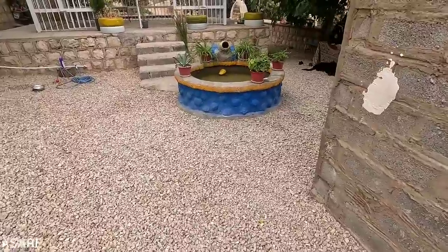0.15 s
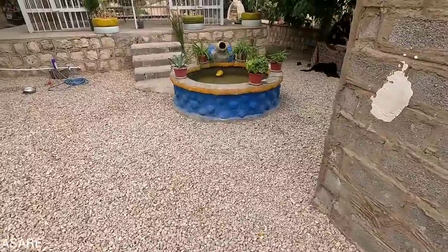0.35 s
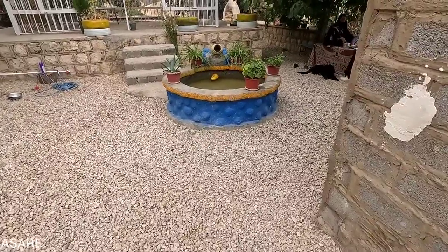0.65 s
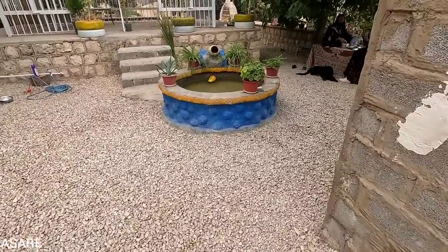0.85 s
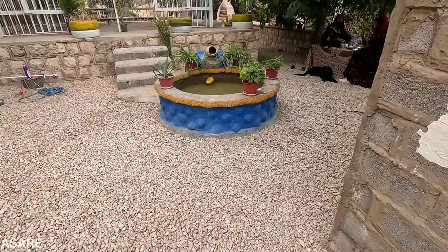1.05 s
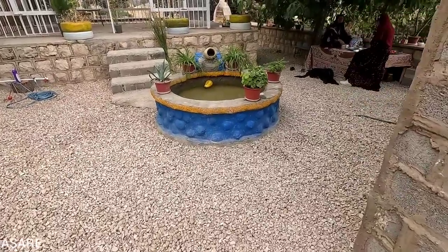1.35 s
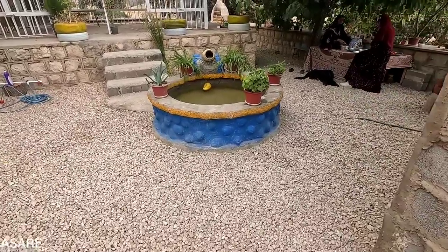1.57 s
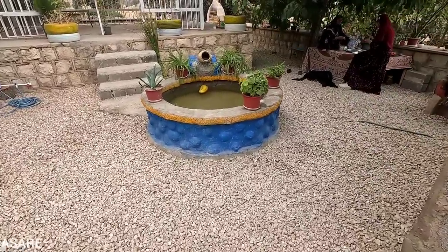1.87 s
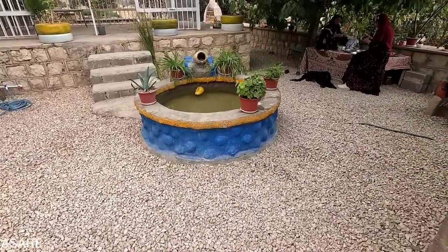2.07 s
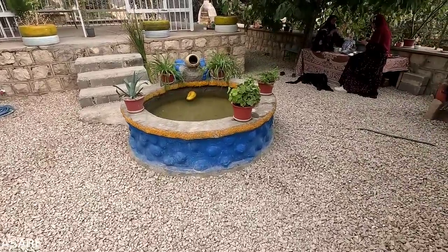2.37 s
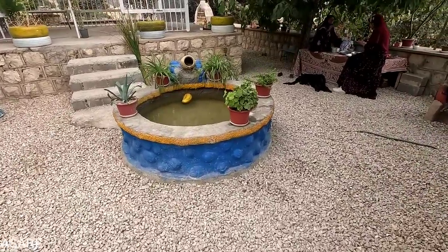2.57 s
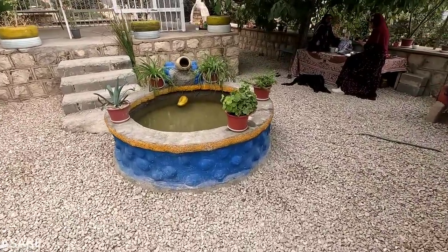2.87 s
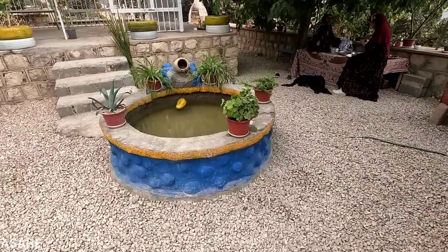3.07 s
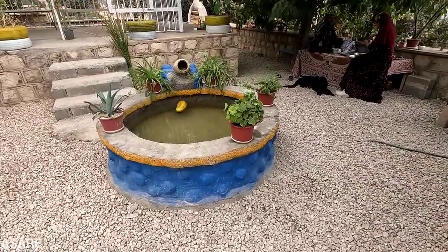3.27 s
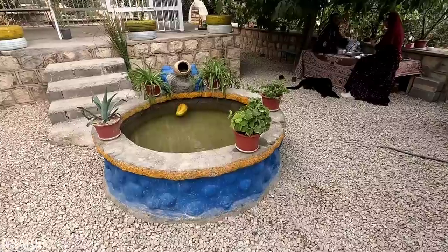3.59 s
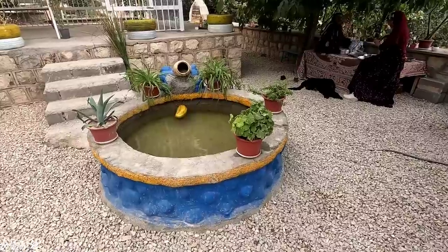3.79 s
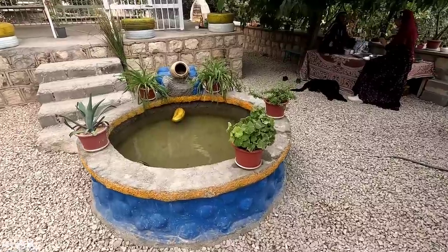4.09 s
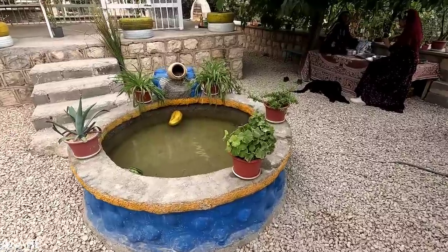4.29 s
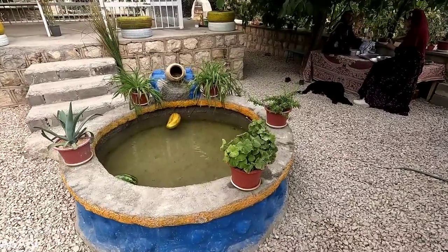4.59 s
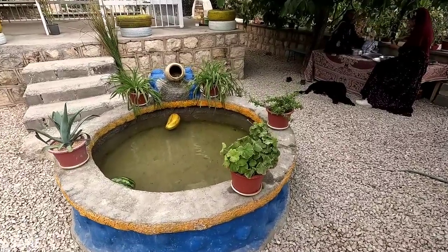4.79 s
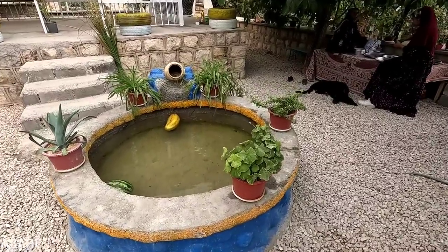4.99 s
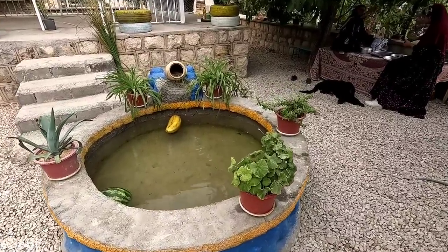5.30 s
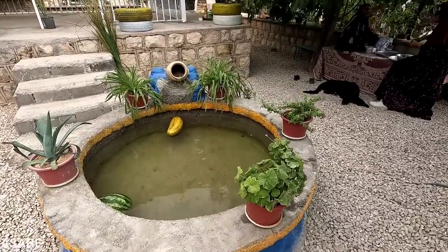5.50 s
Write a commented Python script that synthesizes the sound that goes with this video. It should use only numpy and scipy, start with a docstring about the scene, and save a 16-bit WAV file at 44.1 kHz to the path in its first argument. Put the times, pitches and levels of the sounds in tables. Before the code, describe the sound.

In an open, stone-walled gravel yard, a thin stream falls into a basin. At first the water is a faint, continuous trickle some way ahead, with soft low plops at 0.1-0.3 s. A handheld stereo microphone is carried slowly closer. Gravel grinds underfoot near 0.4, 1.3, 2.1-2.3, 3.2, 4.1 and 5.1 s, with dull pebble knocks; sharp snaps stand out around 2.2, 3.2 and 5.2 s. Low wind thumps press on the microphone, mild at 0.4 and 1.3 s, strongest at 2.2-2.5 and 3.0-3.2 s, weaker around 3.7 and 4.1 s, slightly heavier on the right. From 3.4 s plops crowd together, and after 4.5 s bright drips and ticks ring clearly over bubbling and fizzy spray. A quiet hiss and rumble swells around 4 s. The trickle is loudest and brightest at the end, about 5.6 s, with a wet plop near 5.46 s.

```python
"""Walking up to a garden basin

A thin stream of water falls into a basin in a walled gravel yard: noise clicks make the spray's ticks,
fading sine tones make small bubbles ping and larger ones plop. Someone walks slowly toward it with the
microphone: gravel grinds and pebbles knock, and the trickle grows louder and brighter.
Low noise and single pressure pulses make the wind that thumps on the microphone's two ports.
Steady noise makes a background of hiss and low rumble that swells by about 6 dB, mostly near 4 s."""
import sys
import numpy as np
from scipy import signal
from scipy.fft import rfft, irfft, next_fast_len
from scipy.io import wavfile
from scipy.ndimage import uniform_filter1d, map_coordinates

SR = 44100
rng = np.random.default_rng(int(sys.argv[2]) if len(sys.argv) > 2 else 0)


def to_wav(sig):
    """Store sig (one row per channel, or 1-D mono) as 16-bit WAV at the path in sys.argv[1].

    Samples outside -1..1 are clipped; the rate is SR.
    """
    pcm = np.clip(np.atleast_2d(sig), -1, 1) * 32767
    pcm = np.round(pcm).astype(np.int16)
    wavfile.write(sys.argv[1], SR, pcm.T)  # frames by channels


N = 249165  # length in samples


def amp(db):
    """Turn decibels into a gain."""
    return 10 ** (np.asarray(db) / 20)


def unit(x):
    """Scale to an average (rms) level of 1."""
    return x / np.sqrt(np.mean(x ** 2) + 1e-20)


def along(points, hz):
    """Read a curve of (Hz, value) points on a logarithmic pitch axis."""
    f, v = np.transpose(points)
    return np.interp(np.log(hz + 1), np.log(f + 1), v)


def curves(rows):
    """Draw straight lines between rows: one value per sample for each column after the time."""
    s, *cols = np.transpose(rows)
    return [np.interp(np.arange(N) / SR, s, c) for c in cols]


def wobble(rate):
    """A smooth random curve through this many random points a second."""
    points = rng.standard_normal(int(N * rate / SR) + 4)
    return map_coordinates(points, [np.arange(N) * rate / SR])


def filtered(x, response):
    """Multiply the spectrum of x by a response that depends on frequency."""
    m = next_fast_len(N + SR // 2)
    return irfft(rfft(x, m) * response(np.fft.rfftfreq(m, 1 / SR)), m)[..., :N]


def coloured(x, spectrum):
    """Shape x with a (Hz, dB) spectrum."""
    return filtered(x, lambda hz: amp(along(spectrum, hz)))


def noise(spectrum):
    """Coloured noise with an rms level of 1."""
    return unit(coloured(rng.standard_normal(N), spectrum))


def pair(spectrum, side_db):
    """Stereo noise: a part shared by both ports, and a part of opposite sign at side_db below or above it."""
    mid = noise(spectrum)
    side = amp(side_db) * noise(spectrum)
    return unit(np.array([mid + side, mid - side]))


def steadied(x, length):
    """Even out swells slower than about length seconds, leaving the fast churn."""
    power = uniform_filter1d(np.mean(np.atleast_2d(x) ** 2, axis=0), int(length * SR))
    return x / np.sqrt(np.abs(power) + 0.0072)


def add(track, s, sound):
    """Mix a sound into the track at time s."""
    start = int(np.clip(round(s * SR), 0, N - 1))
    track[start:start + len(sound)] += sound[:N - start]


def bubble(t, hz, cycles, rise):
    """A trapped air bubble swells, then dies away; its pitch rises by the given share near the surface."""
    age = t * hz / cycles
    glide = 1 + rise * age / (2 + age / 2)
    envelope = 2 * np.exp(-age) * (1 - np.exp(-2 * age))
    return np.sin(2 * np.pi * hz * t * glide) * envelope


def swarm(times, hz, gain, cycles, rise, size):
    """Many bubbles, each with its own life and glide, summed into one track."""
    t = np.arange(size) / SR
    life = cycles * np.exp(rng.standard_normal((len(times), 1)) / 2)
    rises = rise * rng.uniform(0.091, 0.74, life.shape)
    rings = gain[:, None] * bubble(t, hz[:, None], life, rises)
    rings = rings * (1 - (t / t[-1]) ** 2)  # end in silence
    index = (times * SR).astype(int)[:, None] + np.arange(size)
    return np.bincount(index.ravel(), rings.ravel(), N)[:N]


# Level of the background hiss and rumble. Each row: time in seconds, level in dB.
BACKGROUND_LEVEL = [(0, -61.5), (2, -62), (4, -60), (4.6, -56.5), (5.65, -56)]
# Tone of that background. Each row: frequency in Hz, relative level in dB.
BACKGROUND_TONE = [(60, 4.5), (200, -3), (400, -15), (700, -19), (1100, -17.5), (1800, -22), (5000, -17),
                   (9000, -45), (15000, -48)]


def background():
    """Steady background hiss and low rumble, coloured noise swelling by about 6 dB, mostly near 4 s."""
    return amp(curves(BACKGROUND_LEVEL)[0]) * pair(BACKGROUND_TONE, side_db=-6.5)


# How long echoes last. Each row: frequency in Hz, time to fall by 60 dB in seconds.
ECHO_TIME = [(200, 0.54), (2000, 0.064), (10000, 0.12)]


def yard(x):
    """Stone walls and the basin answer with a short tail of fading noise, different at each port."""
    hz, t, z = signal.stft(rng.standard_normal((2, SR // 2)), SR, nperseg=256)
    fading = amp(-60 * t / along(ECHO_TIME, hz)[:, None])
    tail = signal.istft(z * fading, SR, nperseg=256)[1]
    tail = tail / np.linalg.norm(tail[0])
    delayed = np.pad(x, (100, 0))[None]  # by 100 samples
    return signal.fftconvolve(delayed, tail, axes=1)[:, :N]


# Gusts over the breeze. Each row: start in seconds, length in seconds, level in dB before the final balance.
GUSTS = [(0.32, 0.27, -40), (0.79, 0.44, -44.5), (2.124, 0.38, -32.5), (2.75, 0.38, -32.5),
         (3.079, 0.24, -31.5), (3.513, 0.29, -39), (3.992, .16, -38), (4.648, 0.5, -45)]
# Hard puffs on the ports. Each row: time in seconds, level in dB before the final balance, width in seconds.
THUMPS = [(0.411, -30.5, 0.0064), (1.306, -21, 0.008), (2.226, -16.5, 0.004), (2.315, -25.5, 0.0033),
          (2.367, -13, 0.0056), (2.417, -24, 0.0026), (2.472, -23.5, 0.0057), (2.962, -20, 0.0047),
          (3.008, -18.5, 0.0054), (3.13, -20.5, 0.0083), (3.228, -12.5, 0.0046), (3.625, -24, 0.007),
          (3.673, -23.5, 0.0089), (3.726, -20.5, 0.0078), (4.112, -23.5, 0.0078), (5.007, -27, 0.012)]
# Tone of the slow eddies. Each row: frequency in Hz, relative level in dB.
BUFFET = [(8, -30), (20, 10), (42, -1.5), (70, -14.5), (110, -31), (200, -41.5), (400, -91), (1000, -120)]
# Tone of the small fast eddies. Each row: frequency in Hz, relative level in dB.
FLUTTER = [(40, -11), (80, 16), (120, -1.5), (190, -6), (300, -29), (500, -46), (1200, -52), (3000, -120)]
# Tone of the rough air around a thump. Each row: frequency in Hz, relative level in dB.
WAKE = [(60, -1), (180, 4), (320, -6.5), (500, -17.5), (1200, -18), (3000, -74)]
GUST_EDGE = 0.52  # share of a gust spent rising and falling
BREEZE_DB, BREEZE_SWING_DB, BREEZE_SWINGS_PER_S = -45.5, 3, 8
FLUTTER_DB, FLUTTER_GROWS = -72, 1.91  # level in the breeze; dB gained per dB of gust
WAKE_DB, WAKE_GROWS = -38.5, 2.78  # level at the hardest thump; dB it changes per dB of thump


def wind():
    """Eddies press on the ports, harder on the right; gusts stir up fast ones, and thumps have a rough wake."""
    gusts, thumps, wakes = np.zeros((3, N))
    for s, length, db in GUSTS:
        add(gusts, s, amp(db) * signal.windows.tukey(int(length * SR), GUST_EDGE))
    strength = np.hypot(1, gusts / amp(BREEZE_DB))  # 1 = the breeze alone
    strength = strength * amp(BREEZE_SWING_DB * wobble(BREEZE_SWINGS_PER_S))
    slow = amp(BREEZE_DB) * strength * steadied(pair(BUFFET, side_db=-16), length=0.0565)
    fast = amp(FLUTTER_DB) * strength ** FLUTTER_GROWS * steadied(pair(FLUTTER, side_db=-6), length=0.045)
    hardest_db = max(db for s, db, width in THUMPS)
    for s, db, width in THUMPS:
        u = (np.arange(N) / SR - s) / width
        thumps += amp(db - 3.5) * (1 - 2 * u ** 2) / (1 + u ** 2) ** (5 / 2)  # pressure of a passing vortex
        wakes += amp(WAKE_DB + WAKE_GROWS * (db - hardest_db)) / (1 + (u / 2) ** 2)
    rough_air = wakes * pair(WAKE, side_db=0.5)
    return (slow + fast + thumps + rough_air) * amp([[-2.6], [2]])  # left, right in dB


# Soles pressing into the gravel. Each row: start in seconds, length in seconds, level in dB.
STEPS = [(0.406, 0.29, -57.5), (1.291, 0.071, -46.5), (2.113, 0.1, -51.5), (2.309, 0.16, -57.5),
         (3.155, 0.078, -52.5), (4.078, 0.11, -58), (5.097, 0.16, -55)]
# Pebbles knocking under a shoe. Each row: time in seconds, knock level in dB before the mix,
# knock pitch in Hz, level of the bright snap in dB before its tone is shaped.
PEBBLES = [(.471, -38, 1190, -43), (.665, -41, 1180, -77), (1.311, -39, 970, -48.5), (1.318, -41, 320, -56),
           (1.322, -42, 570, -54.5), (1.331, -36, 970, -53), (1.464, -44.5, 1070, -78),
           (1.574, -45.5, 1230, -61), (2.171, -39.5, 1320, -36), (3.178, -43, 1130, -48.5),
           (3.192, -49, 522, -53), (3.2233, -37.5, 980, -34), (3.996, -45.5, 1210, -69),
           (5.183, -44.5, 1360, -37.5), (5.266, -47, 1120, -49)]
# Tone of grinding and rattling gravel. Each row: frequency in Hz, gain in dB.
GRAVEL = [(100, -2), (300, 3), (500, -0.5), (850, 1.5), (1350, 2), (2000, -9.5), (4000, -12), (8000, -15),
          (11000, -46)]
# Tone of a bright snap, also used for the ticks of single drops. Each row: frequency in Hz, gain in dB.
SNAP = [(400, -48), (800, -10), (2500, 7), (4300, 10.5), (7500, 11.5), (10000, -6), (15000, -24)]
THUD_DB, THUD_HZ = -16.5, 294  # the ground under a pebble: dB relative to the pebble's row, pitch


def footsteps():
    """Gravel grinds under each sole; pebbles knock dully, snap, rattle their neighbours and thud in the ground."""
    grind, knocks, rattle, snaps = np.zeros((4, N))
    for s, length, db in STEPS:
        add(grind, s, amp(db) * np.sqrt(np.abs(np.hanning(int(length * SR)))))
    chance = rng.random((3500, 3))  # the grinding is a crowd of tiny stone contacts
    pitch_ratio = 18 ** chance[:, 1]
    force = amp(13.0 * chance[:, 2] ** 2) * pitch_ratio
    grit = swarm(chance[:, 0] * N / SR, 400 * pitch_ratio, force, cycles=0.85, rise=0, size=400)
    crunch = steadied(unit(coloured(grit, GRAVEL)), length=0.049)
    t = np.arange(SR // 10) / SR
    for s, db, hz, snap_db in PEBBLES:
        # a knock or thud is a ring that dies within a few cycles
        add(knocks, s, amp(db + 6.5) * bubble(t, hz, cycles=1.9, rise=0))
        add(knocks, s, amp(db + THUD_DB) * bubble(t, THUD_HZ, cycles=1.46, rise=0))
        add(rattle, s, amp(db - 0.5) * np.exp(-t / 0.019) * rng.standard_normal(len(t)))
        add(snaps, s, amp(snap_db) * np.exp(-t / 0.0019) * rng.standard_normal(len(t)))
    return grind * crunch + knocks + coloured(rattle, GRAVEL) + coloured(snaps, SNAP)


# Large bubbles. Each row: time in seconds, level in dB before the ring's own shape,
# approximate pitch in Hz, cycles of ringing.
PLOPS = [(.146, -54, 720, 7.6), (.197, -56.5, 716, 7.5), (.317, -50.5, 790, 3.5), (1.104, -51.5, 718, 8),
         (1.203, -40.5, 974, 3.5), (1.412, -44, 1520, 4.9), (1.692, -49.5, 1325, 6.5),
         (2.521, -44.5, 970, 6.8), (2.807, -36, 869, 6.3), (3.389, -41.5, 714, 6.7),
         (3.431, -41.5, 810, 4.2), (3.547, -51, 935, 6.4), (3.718, -43.5, 832, 7), (3.76, -40, 1390, 4.3),
         (3.862, -49.5, 631, 6.5), (3.896, -45.5, 735, 4.8), (4.051, -43, 1390, 9.8), (4.055, -48, 683, 10),
         (4.134, -46, 1050, 5.6), (4.309, -49.5, 848, 7.9), (4.625, -40.5, 1480, 4.3),
         (4.726, -41, 1050, 6), (4.81, -48, 980, 5.6), (4.965, -41, 1046, 8.8), (5.355, -43.5, 1170, 5),
         (5.414, -43, 794, 4.8), (5.458, -35.5, 743, 4.5), (5.463, -33.5, 1310, 2.2),
         (5.533, -46.5, 546, 3.4)]
# Single drops that trap a small bubble. Each row: time in seconds, level in dB before the mix,
# approximate pitch in Hz.
DRIPS = [(1.3885, -41, 4000), (1.582, -40, 3500), (1.6261, -39.5, 2800), (1.674, -40.5, 2760),
         (1.7449, -35, 7440), (1.927, -36.5, 4530), (2.5416, -37, 2600), (2.6348, -40.5, 7330),
         (2.7656, -42, 2000), (2.807, -36, 2460), (3.2794, -35.5, 4450), (3.423, -34, 5090),
         (3.6215, -35, 2180), (4.5158, -28.5, 2460), (4.6733, -38, 6600), (4.89, -41, 2410),
         (4.9246, -33.5, 4500), (4.981, -35, 3750), (5.015, -30, 4900), (5.103, -35.5, 3570),
         (5.164, -29, 3680), (5.3545, -38, 4440), (5.458, -30.5, 2640), (5.5975, -39, 2600)]
# Tone of a plop's splash. Each row: frequency in Hz, gain in dB.
SLAP = [(200, -29), (550, -9), (1300, 5.5), (2500, -7), (9000, -26), (15000, -65)]
SLAP_S, TICK_S = .0035, .0012  # fading times of a splash and a tick, in seconds
# bubbles that follow a plop: dB relative to its row, mean gap, scale of the upward pitch spread, ringing
SHED_DB, SHED_GAP_S, SHED_OCTAVES, SHED_CYCLES = -10.5, .016, 0.34, 2.9


def drops():
    """The clearest bubbles: low plops splash and shed two weaker bubbles; short pings start with a tick."""
    rings, slaps, ticks = np.zeros((3, N))
    t = np.arange(SR // 8) / SR
    for s, db, hz, cycles in PLOPS:
        add(rings, s - .001, amp(db) * bubble(t, hz * .99, cycles, rise=0.014))
        add(slaps, s, amp(db + 1) * rng.standard_normal(len(t)) * np.exp(-t / SLAP_S))
        delays = SHED_GAP_S * np.cumsum(rng.uniform(0, 2, size=2))
        raises = SHED_OCTAVES * rng.uniform(0, 1.77, size=2)
        for delay, octaves in zip(delays, raises):
            add(rings, s + delay, amp(db + SHED_DB) * bubble(t, hz * 2 ** octaves, SHED_CYCLES, rise=0.05))
    for s, db, hz in DRIPS:
        add(rings, s, amp(db - 2.5) * bubble(t, hz * 0.988, cycles=4.25, rise=.035))
        add(ticks, s, amp(db - 13.5) * rng.standard_normal(len(t)) * np.exp(-t / TICK_S))
    return rings + coloured(slaps, SLAP) + coloured(ticks, SNAP)


# Tone of a stray drop hitting the surface. Each row: frequency in Hz, gain in dB.
TICK = [(300, -45), (800, -22), (2500, 8), (7500, 0), (10000, -15), (13500, -3.5), (15500, -26)]
STRAY_DB, STRAY_TICK_DB = 11, 12.5  # gains of the pings and the ticks before the bubbling level


def stray_drops(count):
    """Drops flung clear of the stream land at random; each breaks up in a few quick ticks and a ping."""
    chance = rng.random((count, 3))
    times, force = chance[:, 0] * N / SR, amp(6.8 * chance[:, 2])
    pings = swarm(times, 2100 * 3.97 ** chance[:, 1], force, cycles=8.9, rise=0.056, size=700)
    contacts = times[:, None] + rng.normal(0, 0.00097, size=(count, 4))
    strength = force[:, None] * rng.standard_normal(contacts.shape)
    index = np.abs(contacts * SR).astype(int)
    ticks = np.bincount(index.ravel(), strength.ravel(), N)[:N]
    return amp(STRAY_DB) * pings + amp(STRAY_TICK_DB) * coloured(ticks, TICK)


# Tone of the falling water, also used for its fizz. Each row: frequency in Hz, relative gain in dB.
WATER = [(250, -25), (500, -19), (800, -18.5), (1300, -3.5), (1750, -10.5), (2400, -1), (3300, -6.5),
         (4500, -6.5), (5800, -2.5), (7400, -3.5), (8500, -8), (9700, -21), (13200, -29), (15500, -37)]


def splashes(count, size, low_hz, high_hz, spread_db, scatter, cycles, tick_db):
    """Blobs of the stream hit the pool with a tick; each throws a few tiny bubbles within milliseconds."""
    hit = (np.arange(count) + rng.uniform(0, 2.7, count)) * N / SR / count
    force = np.clip(rng.standard_normal((count, 1)), -2, 2)
    times = (hit[:, None] + scatter * rng.exponential(1, (count, size))).ravel()
    strength = np.minimum(force + rng.standard_normal((count, size)), 2).ravel()
    hz = low_hz * (high_hz / low_hz) ** rng.random(count * size)
    gain = amp(spread_db * strength) * np.sqrt(hz / high_hz)
    rings = swarm(times, hz, gain, cycles, rise=0.065, size=500)
    ticks = np.bincount((hit * SR).astype(int), amp(spread_db * force[:, 0] + tick_db), N)[:N]
    return steadied(unit(coloured(rings + ticks, WATER)), length=0.17)  # the flow itself is even


# The walk toward the basin. Each row: time in seconds, distance from the falling stream in metres.
DISTANCE = [(0, 11.8), (1.6, 7.2), (3.0, 4.52), (4.4, 3.55), (5.1, 2.9), (5.65, 2)]
BUBBLING_DB, SPRAY_DB = -52.5, -49  # group levels at one metre, before the mix inside each group
BUBBLING_FALL_DB, SPRAY_FALL_DB = 4.5, 7  # lost with each doubling of the distance
RIM_DB, RIM_FALL_DB = -5, .5  # gurgle gain within the bubbling at one metre; hidden by the rim per doubling
GURGLE_SPREAD_DB = 12  # from the weakest to the strongest gurgle bubble
SURGE_DB, SURGES_PER_S = 1.77, 7  # the stream's slight unsteadiness
PING_CYCLES, SPRAY_CYCLES = 2.8, 2.3  # typical ringing


def trickle():
    """Bubbling and fine spray over a soft fizz and a low gurgle; all grow as the basin comes nearer."""
    doublings = np.log2(curves(DISTANCE)[0])
    surge_db = SURGE_DB * wobble(SURGES_PER_S)
    bubbling_db = BUBBLING_DB - BUBBLING_FALL_DB * doublings + surge_db
    spray_db = SPRAY_DB - SPRAY_FALL_DB * doublings + surge_db
    pings = splashes(count=660, size=4, low_hz=1395, high_hz=4880, spread_db=4.0, scatter=0.0035,
                     cycles=PING_CYCLES, tick_db=14.0)
    spray = splashes(count=650, size=5, low_hz=3890, high_hz=13550, spread_db=7.0, scatter=.0018,
                     cycles=SPRAY_CYCLES, tick_db=11.5)
    flicker = amp(7.3 * np.tanh(wobble(400)))
    fizz = unit(coloured(rng.standard_normal(N) * flicker, WATER))
    chance = rng.random((600, 3))
    gurgle = swarm(chance[:, 0] * N / SR, 780 * 2.1 ** chance[:, 1],
                   amp(GURGLE_SPREAD_DB * chance[:, 2] ** 2), cycles=5.8, rise=0.03, size=1500)
    gurgle = unit(gurgle * amp(7.3 * np.tanh(wobble(10.0))))  # air is dragged under in gulps
    rim_db = RIM_DB - RIM_FALL_DB * doublings
    bubbling = amp(2) * pings + amp(rim_db) * gurgle + stray_drops(count=56)
    fine_spray = amp(2.38) * spray + amp(-3.5) * fizz
    return amp(bubbling_db) * bubbling + amp(spray_db) * fine_spray


def scene():
    """Water ahead and steps below with their echo, over wind and the background hiss and rumble."""
    near = trickle() + drops() + footsteps()
    lean = [(3000, 0.26), (6000, 0.3), (8500, 1.4), (13000, 3.6)]  # left hears more treble: (Hz, dB)

    def at_ports(hz):
        left = amp(along(lean, hz))
        right = amp(-along(lean, hz)) * np.exp(-2j * np.pi * hz * 1.0e-5)  # 10 microseconds later
        return np.array([left, right])

    ports = filtered(near, at_ports)
    # the top treble is mostly scattered, so the echo is bright: (Hz, dB)
    echo = coloured(yard(near), [(500, -20.5), (2000, -6.0), (7000, -8.5), (12000, 0.0)])
    return ports + echo + background() + wind()


TOP_HZ = 15700  # band limit


def record(dry):
    """The recorder keeps nothing above its band limit."""
    return filtered(dry, lambda hz: hz < TOP_HZ)


dry = scene()
out = record(dry)
to_wav(out)
```